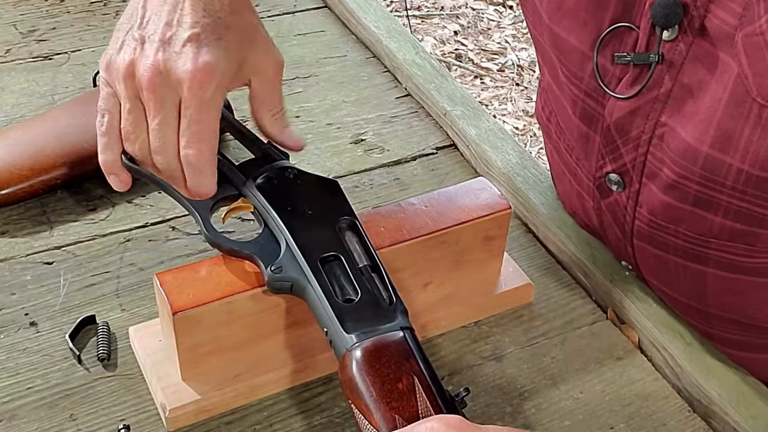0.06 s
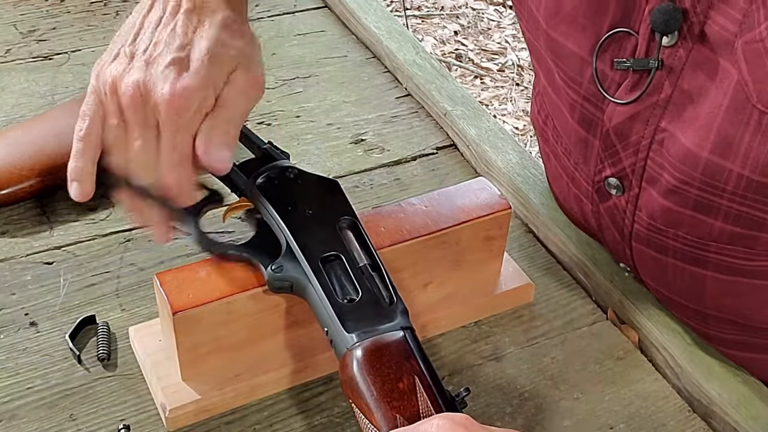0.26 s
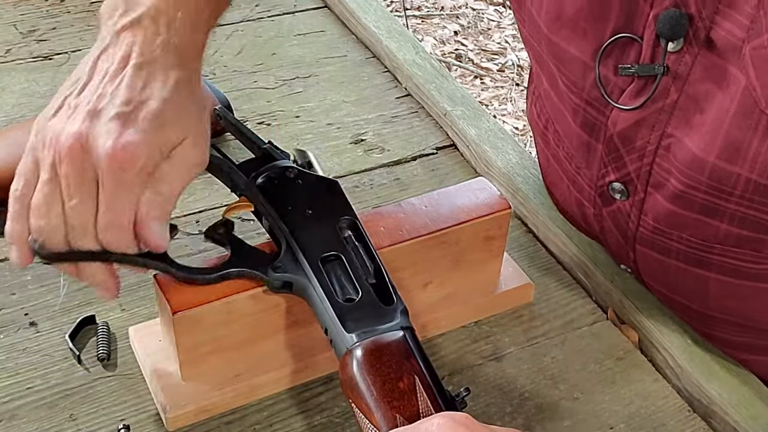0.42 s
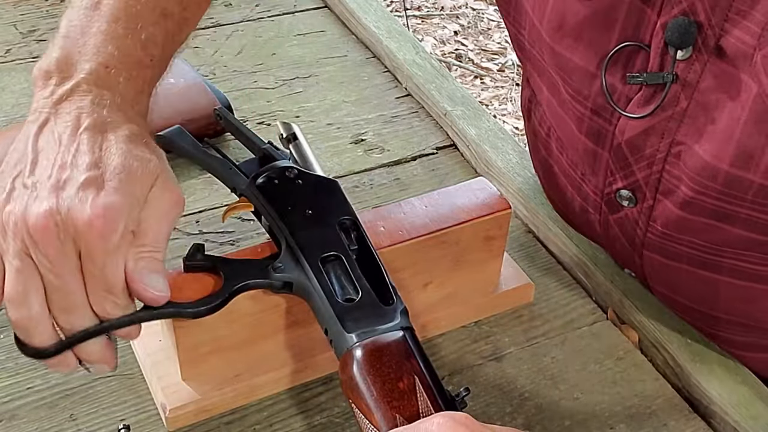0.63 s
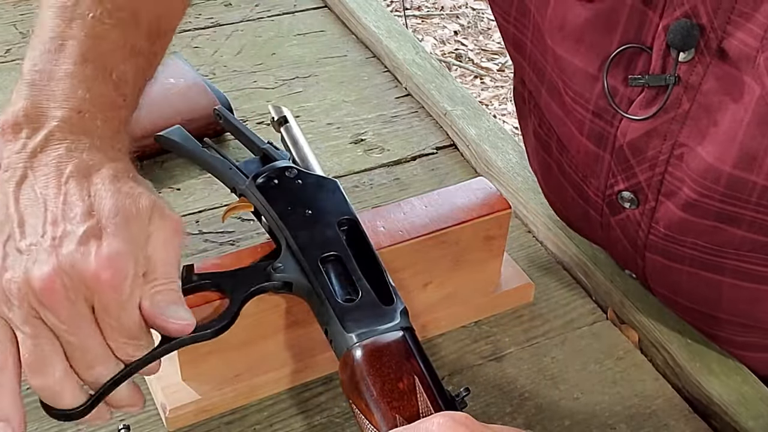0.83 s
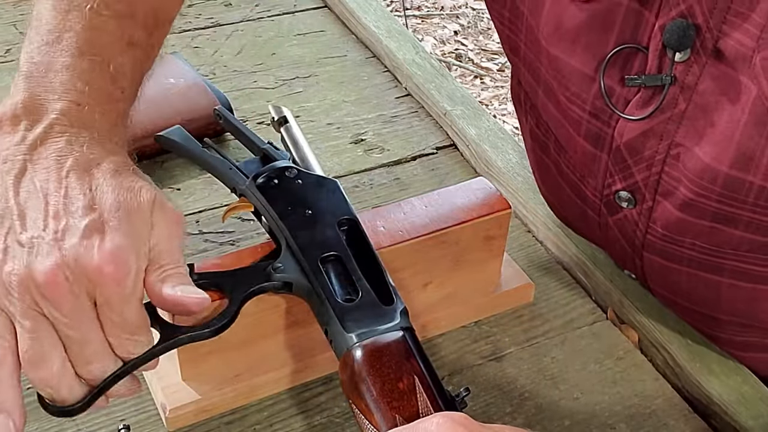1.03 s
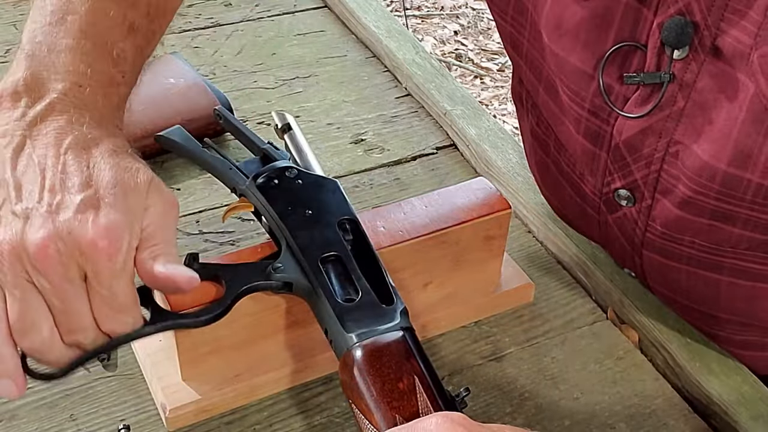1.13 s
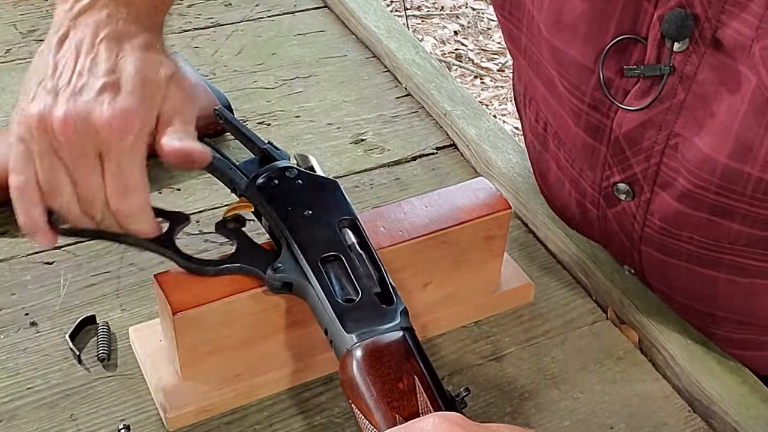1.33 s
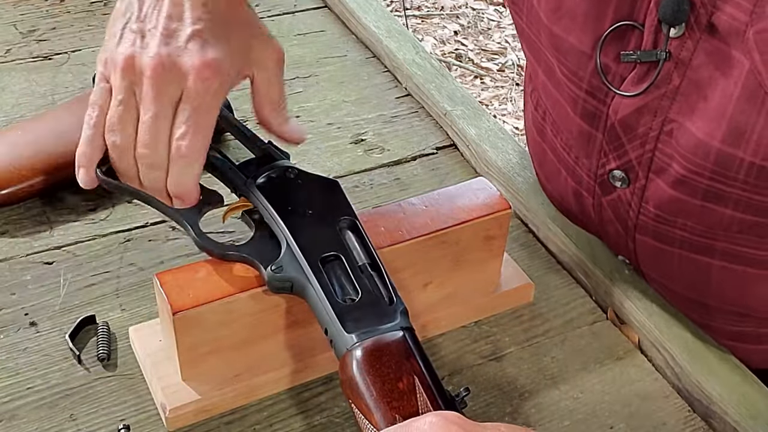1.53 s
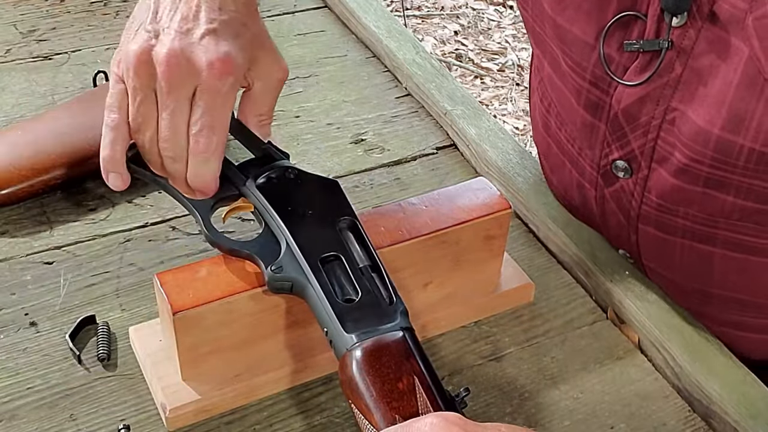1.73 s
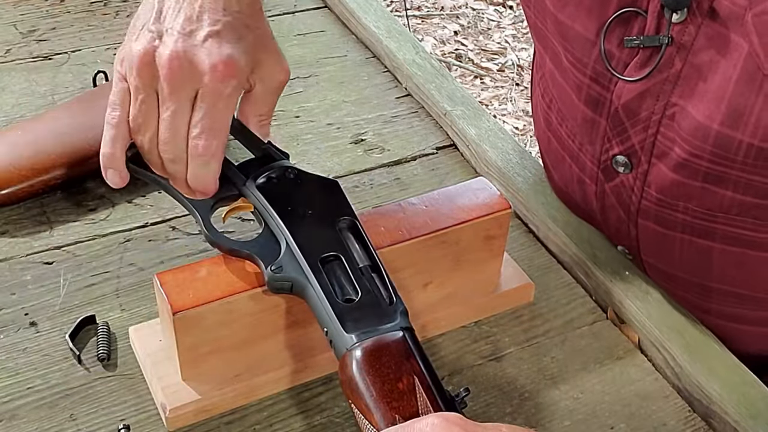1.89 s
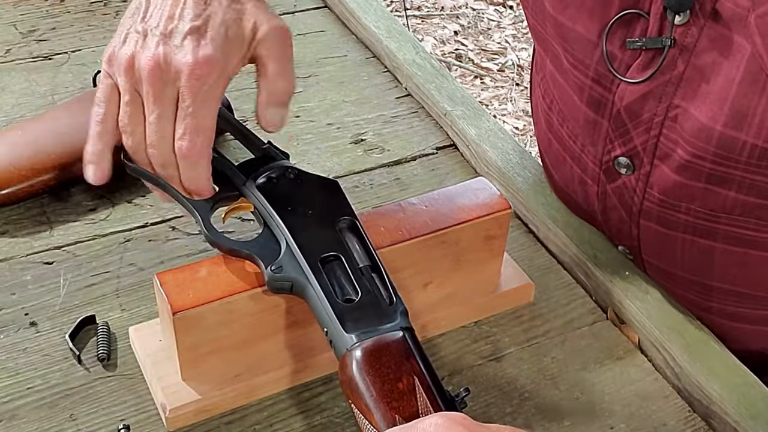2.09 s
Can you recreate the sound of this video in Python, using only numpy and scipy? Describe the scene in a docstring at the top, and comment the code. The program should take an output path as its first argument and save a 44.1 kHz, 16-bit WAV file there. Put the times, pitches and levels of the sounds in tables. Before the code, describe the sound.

A rifle's lever is cycled by hand on a wooden stand outdoors: a loud unlatching snap, a clack at full opening, a rattle of closing clicks, and a firm locking clack, close and dry.

```python
"""Rifle lever swung open and shut

Someone works the lever of a partly assembled rifle by hand, outdoors on a wooden stand.
Steel parts unlatch, slide, hit their stops and lock again. Each contact is a noisy crack, ringing
steel made of fading sine waves, and a softer knock and thud in the wood. Filtered noise makes the
sliding, scraping and handling; wavering tones make the groans. Quiet air and a hum lie beneath.
"""
import sys
import numpy as np
from scipy import signal
from scipy.fft import rfft, irfft
from scipy.io import wavfile
from scipy.ndimage import uniform_filter1d

SR = 44100
rng = np.random.default_rng(int(sys.argv[2]) if len(sys.argv) > 2 else 0)


def wav_record(signal):
    """Record a signal, one row per channel, as 16-bit PCM in the file named by sys.argv[1]."""
    frames = np.transpose(np.atleast_2d(signal))
    bounded = np.clip(frames, -1, 1)
    # unit amplitude maps onto the largest positive 16-bit level
    quanta = np.round(bounded * 32767).astype(np.int16)
    wavfile.write(sys.argv[1], SR, quanta)


N = 94815
TIME = np.arange(N) / SR
HIT = TIME[:SR // 3]  # time axis of one blow, in seconds

# In all tables, t60/s is the time a sound takes to fade by 60 dB.
# Quiet outdoor air: f/Hz, relative level per Hz/dB
AIR = [(20, -1.5), (125, -7.5), (190, -16.5), (400, -13), (700, -22), (1030, -15.5), (1350, -28),
       (2000, -21.5), (3000, -37), (16000, -46)]
AIR_DB = -68
HUM_HZ, HUM_DB = 123.2, -72.5

# Spectrum of the handling rumble: f/Hz, relative level per Hz/dB
HANDLING_SPECTRUM = [(30, 2.5), (150, -11.5), (800, -68.5)]
# Strength of the handling rumble over time: t/s, level/dB
HANDLING_LEVEL = [(0, -50), (.22, -65), (.258, -40.5), (.36, -54), (.58, -64.5), (.7, -48.5), (.9, -66),
                  (1.33, -63.5), (1.43, -55), (2.15, -69.5)]

# Strength of the friction as the bolt slides in the receiver: t/s, level/dB
SLIDE_LEVEL = [(.2, -76), (0.341, -58), (.6, -68), (.68, -55.5), (.8, -77.5), (.98, -81.5), (1.1, -53.5),
               (1.33, -69), (1.49, -71.5), (1.8, -80)]
# Resonances that the sliding wakes: f/Hz, relative level/dB
RUB_RESONANCES = [(247, 2.5), (320, 1), (410, 1.5)]
# Spectrum of the sliding hiss: f/Hz, relative level per Hz/dB
HISS_SPECTRUM = [(700, -10), (2100, 7.5), (4500, -2.5), (10000, -8), (16000, -16.5)]
RUB_WIDTH_HZ = 110
HISS_DB, GRIT_DB = -12, 3.5  # hiss against the murmur; depth of its gritty level changes

# Scrapes of the closing bolt: start t/s, length/s, f/Hz, level/dB
SCRAPES = [(1.235, .08, 3130, -76), (1.278, 0.074, 1860, -65.5)]
SCRAPE_SKIRT_DB = -53.5  # an octave away from the scrape's pitch

# Groans of sliding parts that bind: start t/s, length/s, middle f/Hz, level/dB
GROANS = [(0.628, 0.075, 426.3, -45.5), (1.087, 0.092, 246.3, -51), (1.232, 0.108, 250.4, -48)]
GROAN_WAVER = 0.035  # typical pitch change, as a fraction
SWELL_SKEW = 2.6  # above 1, groans and scrapes peak late

# Shaken spring: t/s, level/dB
SPRING_PINGS = [(.252, -52.5), (.427, -72)]
SPRING_HZ, SPRING_T60_S = 13905, 0.14

# Stock and wooden stand: average f/Hz, relative level/dB, t60/s
STAND_MODES = [(247, -9, 0.08), (306.9, -11.5, 0.12), (388.6, 0, 0.057), (561.8, -10, 0.067),
               (929, -15, 0.092)]
# Dull thud in the wood: f/Hz, relative level per Hz/dB
THUD_SPECTRUM = [(30, -4.5), (140, 4), (430, -1.5), (780, -15.5), (1100, -11.5), (3000, -50.5)]
KNOCK_RISE_S, THUD_T60_S = 0.0047, 0.14
DETUNE = 0.026  # typical chance change of a stand pitch, as a fraction

# Dense high modes of the steel: f/Hz, relative level per Hz/dB
STEEL_SPECTRUM = [(150, -17), (700, -16.5), (1000, -2), (2600, 3), (3600, 0.5), (5200, 2.5), (11000, -1.5),
                  (16000, -10.5)]
# Close modes of the struck part: multiple of its pitch, relative level/dB, t60/s
PART_MODES = [(.945, -9.5, 0.062), (1.0, -6, 0.031), (1.065, -8.5, .028)]
# Receiver modes woken at each place: f/Hz, height above the steel's spectrum/dB
RECEIVER_CLUSTERS = { "latch": [(1545, 10.5), (1742, 12.5), (2600, 6), (4820, 8), (5400, 14), (8130, 9.5),
                     (8560, 7.5)], "cam": [(1600, 8.5), (2300, 5), (5750, 5)], "stop": [(2300, 3.5),
                     (3900, 3), (6525, 3)], "link": [(2600, 11.5), (4490, 7.5), (8500, 7)],
                     "carrier": [(3700, 6), (8130, 10.5)], "bolt": [(950, 6), (1310, 9.5), (1580, 6.5),
                     (3050, 6.5), (5830, 5)], "catch": [(4790, 12.5), (6430, 9.5), (8000, 3.5)],
                     "lock": [(2080, 7), (2690, 3), (4800, 5.5), (5700, 11.5), (7300, 11), (9450, 4)], }
CLUSTER_HZ, RING_T60_S = 161, 0.04  # half-width of a cluster's bump; fading of its ring
PIVOT_HZ = 5500  # the brightness tilt turns about this pitch
RISE_S, TAIL_DB, TAIL_T60_S = 0.00094, -15, 0.089
BEAT_DB = 2.5  # close modes beat, so the ringing is uneven

# How each place sounds: crack t60/s, receiver ring against the crack/dB, thud against the knock/dB
PLACES = {"latch": (0.016, -34, -10), "cam": (0.025, -29.5, -9.5), "stop": (0.018, -28.5, -4.5),
          "link": (0.014, -33.5, -12), "carrier": (0.021, -37, -9.5), "bolt": (0.013, -26.5, -1.9),
          "catch": (0.018, -44, -3), "lock": (0.02, -31, -2.5)}
# Contacts, from the hand taking hold through unlatching, opening, closing and locking to the
# start of the next stroke: t/s, place, crack level/dB, brightness/dB per octave,
# pitch f/Hz of the struck part, its ring level/dB, knock level in the stand/dB
CONTACTS = [ (0.0315, "latch", -47.5, -6, 1888, -37.5, -44), (0.2381, "cam", -31.5, 2.5, 1470, -40, -45.5),
            (0.246, "cam", -28, -4, 1670, -30, -39), (0.2504, "latch", -13.5, -2.5, 1619, -21, -34),
            (0.2764, "cam", -31.5, -5, 1600, -27, -33.5), (0.3098, "cam", -30.5, -6.5, 1905, -28, -30.5),
            (.3510, "stop", -45.5, -4.5, 1820, -45, -54), (0.4255, "stop", -40.5, -3.5, 1858, -38.5, -60.5),
            (0.4348, "stop", -42, -6, 1940, -51, -55.5), (0.5363, "carrier", -49, -2, 2610, -58.5, -54.5),
            (0.6904, "stop", -47.5, -2, 2200, -57, -51), (0.7098, "stop", -21.5, 1.5, 2167, -25.5, -42),
            (0.719, "stop", -31.5, -3, 2230, -42, -35), (1.031, "link", -35, -2.5, 2297, -33, -33.5),
            (1.045, "link", -41, -5, 2300, -55, -40.5), (1.0804, "carrier", -28, 1, 2010, -31.5, -37),
            (1.0850, "carrier", -31.5, -5, 2050, -55, -46), (1.1, "carrier", -53, -2, 2450, -56, -40),
            (1.1167, "carrier", -46, -1.5, 2140, -55, -47),
            (1.1690, "carrier", -53.5, -7.5, 2180, -61.5, -54.5),
            (1.3546, "bolt", -42.5, -4.5, 1720, -53, -55), (1.363, "bolt", -36, -2.5, 1800, -43, -40),
            (1.3697, "bolt", -29, -2.5, 1796, -27, -37), (1.372, "bolt", -26.5, -4, 1425, -34, -34.5),
            (1.417, "bolt", -35, -3, 1566, -38, -38.5), (1.558, "catch", -49.5, -1.5, 1834, -41, -43.5),
            (1.5624, "catch", -28.5, -3.5, 1853, -33, -37), (1.593, "catch", -48, -6, 1450, -58, -43),
            (1.6031, "lock", -23, -1, 1314, -32, -32), (2.1448, "cam", -31, 5, 1780, -35, -40.5), ]


def amp(db):
    """Turns decibels into a multiplier."""
    return 10 ** (np.asarray(db) / 20)


def evened(x):
    """Scales to an rms (average strength) of 1."""
    return x / np.sqrt(np.mean(x ** 2) + 1e-20)


def read_spectrum(points, hz):
    """Reads levels between the points of a spectrum, along a log-frequency axis."""
    f, db = np.transpose(points)
    return np.interp(np.log(hz + 1), np.log(f), db)


def level_over_time(points):
    """Joins timed decibel points into a gain for the whole scene."""
    return amp(np.interp(TIME, *np.transpose(points)))


def add(mix, start_s, sound):
    """Mixes a sound in at its start time, cutting it off at the end of the scene."""
    part = mix[max(round(start_s * SR), 0):][:len(sound)]
    part += sound[:len(part)]


def dying(t60):
    """Fades away exponentially, as vibrations lose energy."""
    return np.exp(-np.log(1000) * HIT / t60)


def noise(points, size):
    """Makes noise of rms 1 from a given spectrum and chance phases."""
    hz = np.fft.rfftfreq(size, 1 / SR)
    phase = 2 * np.pi * rng.random(len(hz))
    return evened(irfft(amp(read_spectrum(points, hz)) * np.exp(1j * phase), size))


def smooth_wander(size, window):
    """Averages chance values over neighbouring samples to make a slower wander of rms 1."""
    return evened(uniform_filter1d(rng.standard_normal(size), size=window))


def uneven():
    """Flutters a gain within milliseconds, as loose parts chatter."""
    return amp(BEAT_DB * smooth_wander(len(HIT), 90))


def swell(size):
    """Rises slowly and lets go sooner, as friction builds up and releases."""
    return np.sin(np.pi * np.linspace(0, 1, size) ** SWELL_SKEW)


def ring(modes, scale=1, spread=0):
    """Adds up fading sine waves, each met at a chance point of its swing."""
    total = np.zeros(len(HIT))
    for hz, db, t60 in modes:
        pitch = hz * scale * (1 + spread * rng.standard_normal())
        total += amp(db) * dying(t60) * np.sin(2 * np.pi * (pitch * HIT + rng.random()))
    return np.sqrt(2) * total


def outdoors():
    """Quiet air is shaped noise; the faint distant hum is one steady sine wave."""
    hum = np.sqrt(2) * np.sin(2 * np.pi * HUM_HZ * TIME)
    return amp(AIR_DB) * noise(AIR, N) + amp(HUM_DB) * hum


def handling():
    """A low noise rumble swells and fades as the hand shifts the rifle on its stand."""
    return noise(HANDLING_SPECTRUM, N) * level_over_time(HANDLING_LEVEL)


def slide():
    """Sliding steel hisses grittily and makes the stock and stand murmur."""
    hz = np.fft.rfftfreq(N, 1 / SR)
    body = np.zeros(len(hz), complex)
    for f, db in RUB_RESONANCES:
        body += amp(db) / (1 + 1j * (hz ** 2 - f ** 2) / (RUB_WIDTH_HZ * (hz + 1))) ** 2
    murmur = evened(irfft(body * rfft(rng.standard_normal(N)), N))
    grit = np.minimum(smooth_wander(N, 70), 2)  # the cap limits loud peaks
    hiss = evened(noise(HISS_SPECTRUM, N) * amp(GRIT_DB * grit))
    return (murmur + amp(HISS_DB) * hiss) * level_over_time(SLIDE_LEVEL)


def scrapes():
    """Gritty rubbing is noise that swells in one resonance of the bolt."""
    out = np.zeros(N)
    for start_s, length_s, hz, db in SCRAPES:
        size = round(length_s * SR)
        band = noise([(hz / 2, SCRAPE_SKIRT_DB), (hz, 0), (hz * 2, SCRAPE_SKIRT_DB)], size)
        add(out, start_s, amp(db) * band * uneven()[:size] * swell(size))
    return out


def groans():
    """Stick-slip friction swells into one wavering resonance, then lets go."""
    out = np.zeros(N)
    for start_s, length_s, hz, db in GROANS:
        size = round(length_s * SR)
        waver = smooth_wander(len(HIT), 300)[:size]
        cycles = np.cumsum(hz * (1 + GROAN_WAVER * waver)) / SR
        add(out, start_s, amp(db) * swell(size) * np.sin(2 * np.pi * cycles))
    return out


def spring():
    """A shaken spring pings as one high, fading sine wave."""
    out = np.zeros(N)
    for start_s, db in SPRING_PINGS:
        add(out, start_s, ring([(SPRING_HZ, db, SPRING_T60_S)]))
    return out


def wood_knock(thud_db):
    """A blow rings the stock and stand and adds a dull noise thud, both building up gradually."""
    fade = dying(THUD_T60_S)
    thud = noise(THUD_SPECTRUM, len(HIT)) * fade
    thud *= np.linalg.norm(fade) / np.linalg.norm(thud)  # same energy at every blow
    wood = ring(STAND_MODES, spread=DETUNE) + amp(thud_db) * thud
    return wood * (1 - np.exp(-HIT / KNOCK_RISE_S))


def steel_colour(clusters, tilt_db):
    """Dense steel modes and local clusters colour a blow, with no sound before the blow."""
    hz = np.fft.rfftfreq(len(HIT), 1 / SR)
    octaves = np.log2(np.maximum(hz, PIVOT_HZ / 2) / PIVOT_HZ)
    bumps = [db / (1 + ((hz - f) / CLUSTER_HZ) ** 2) for f, db in clusters]
    colour_db = read_spectrum(STEEL_SPECTRUM, hz) + tilt_db * octaves + np.max(bumps, axis=0)
    log_gain = np.log(evened(amp(colour_db)))
    # minimum phase: the filter responds as early as it can
    mirrored = np.r_[log_gain, log_gain[-2:0:-1]]
    return np.exp(signal.hilbert(mirrored).conj())[:len(hz)]


def crack(clusters, t60, tilt_db):
    """A snap and its rattling noise tail pass through the colour of the struck steel."""
    snap, rattle = rng.standard_normal((2, len(HIT)))
    fade = dying(t60)
    snap = irfft(np.exp(1j * np.angle(rfft(snap * fade))))  # all pitches equally strong
    snap *= np.exp(-(2 * HIT / t60) ** 2)
    snap *= np.linalg.norm(fade) / np.linalg.norm(snap)  # steady energy
    tail = amp(TAIL_DB) * rattle * uneven() * dying(TAIL_T60_S)
    return irfft(rfft(snap + tail) * steel_colour(clusters, tilt_db))


def contact(place, crack_db, bright_db, part_hz, part_db, knock_db):
    """Steel strikes steel: the crack, receiver and struck part sound, and the wood is knocked."""
    crack_t60, ring_db, thud_db = PLACES[place]
    clusters = RECEIVER_CLUSTERS[place]
    receiver_modes = [(hz, db + ring_db, RING_T60_S) for hz, db in clusters]
    receiver = crack(clusters, crack_t60, bright_db) + uneven() * ring(receiver_modes)
    part = uneven() * ring(PART_MODES, scale=part_hz)
    metal = amp(crack_db) * receiver + amp(part_db) * part
    return metal * np.minimum(HIT / RISE_S, 1) + amp(knock_db) * wood_knock(thud_db)


def action():
    """Lever, bolt and latch meet in a series of steel contacts."""
    out = np.zeros(N)
    for start_s, *blow in CONTACTS:
        add(out, start_s, contact(*blow))
    return out


def scene():
    """Sets the rifle close by, over the background."""
    background = outdoors() + handling()
    friction = slide() + scrapes() + groans()
    return (background + friction + spring() + action())[None]


def record(dry):
    """Removes the highest treble with a low-pass filter."""
    edge_hz = 16200
    lowpass = signal.firwin(255, edge_hz, window=("kaiser", 8), fs=SR)
    return signal.oaconvolve(dry, lowpass[None], "same")


dry = scene()
out = record(dry)
wav_record(out)
```